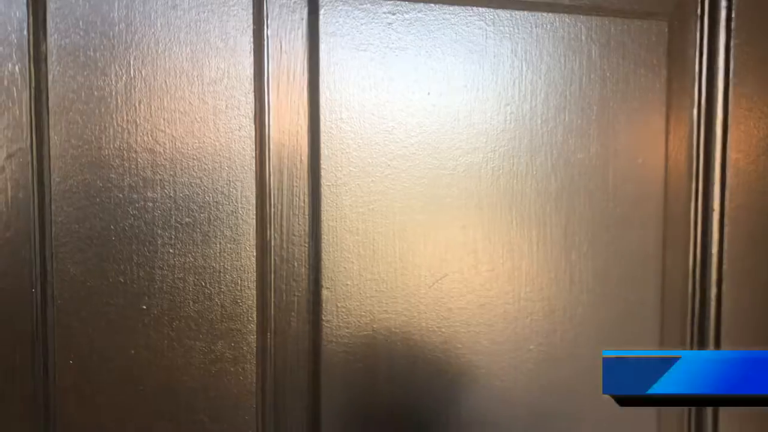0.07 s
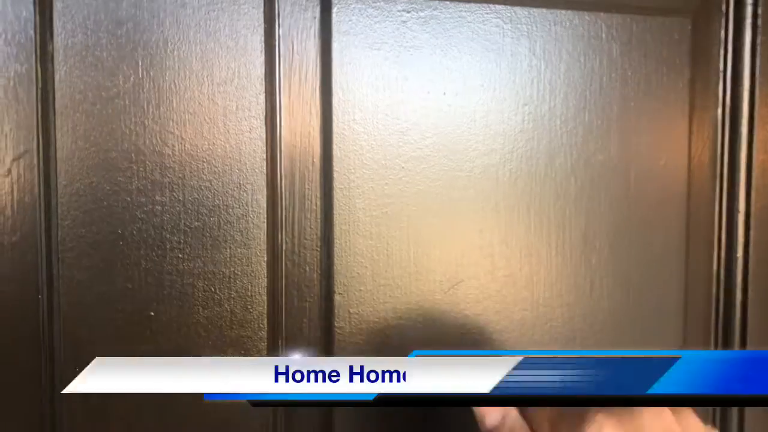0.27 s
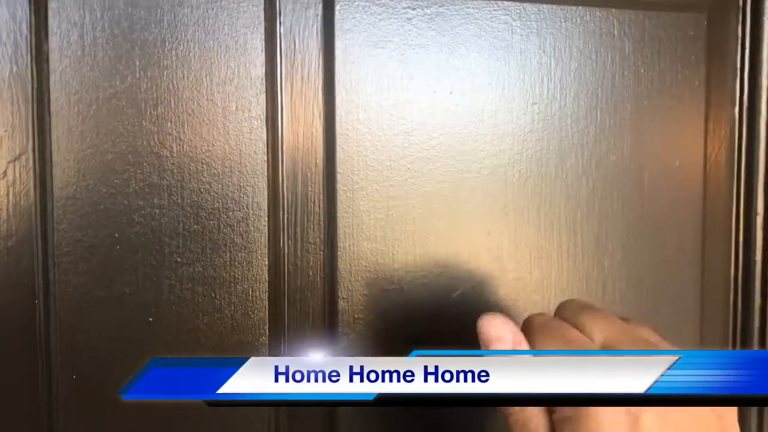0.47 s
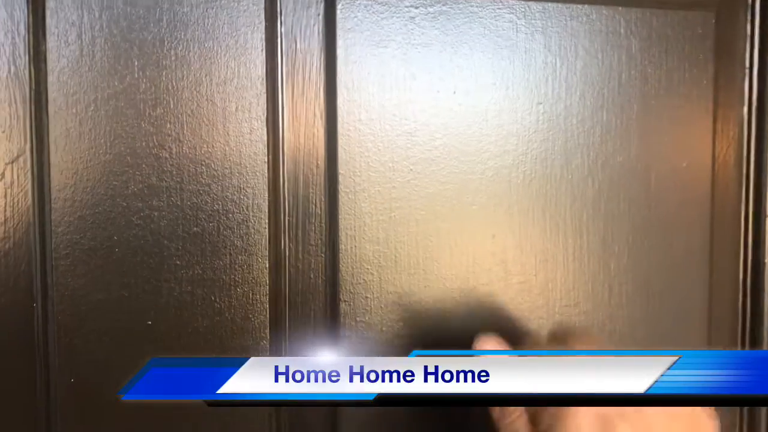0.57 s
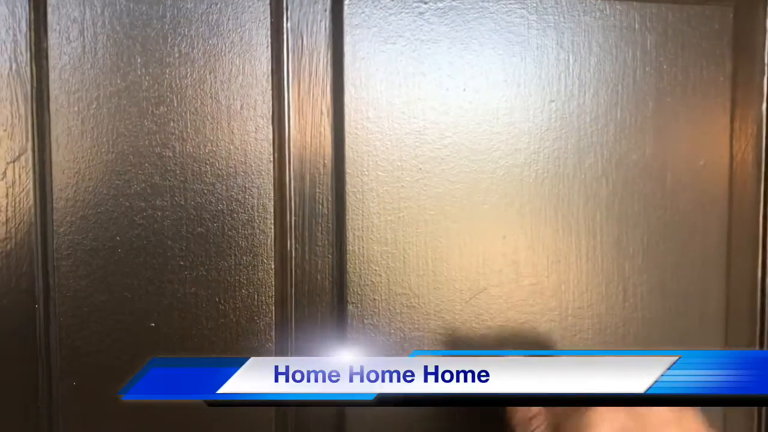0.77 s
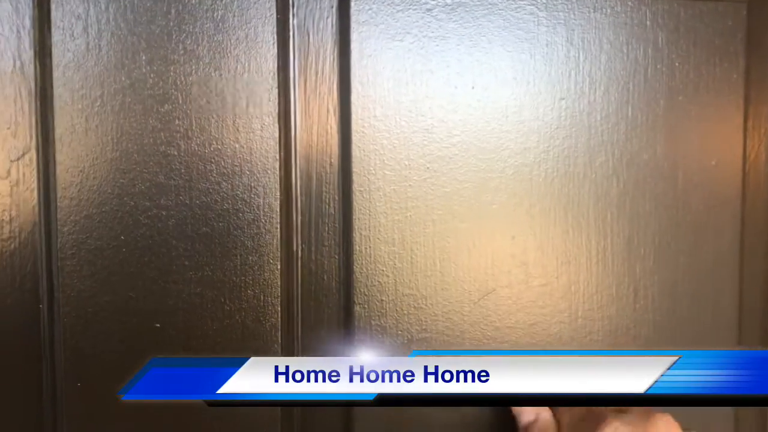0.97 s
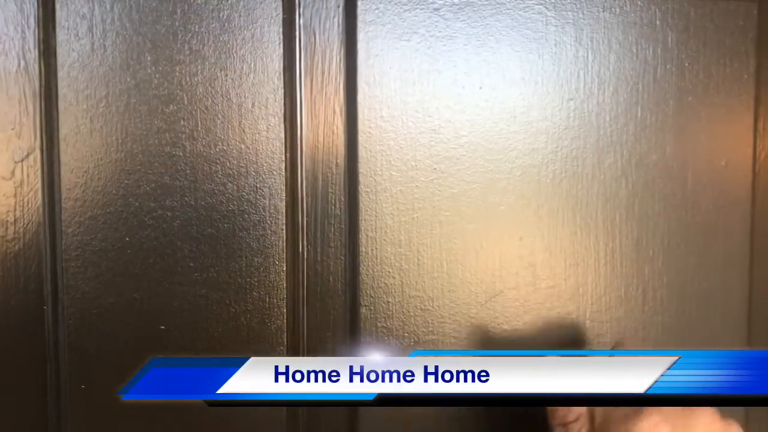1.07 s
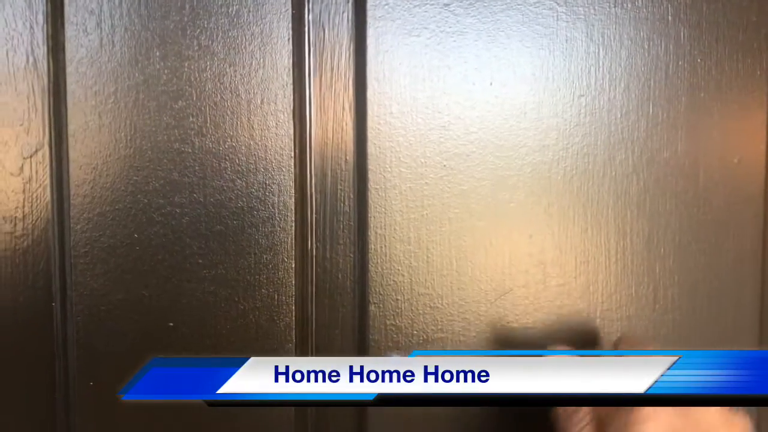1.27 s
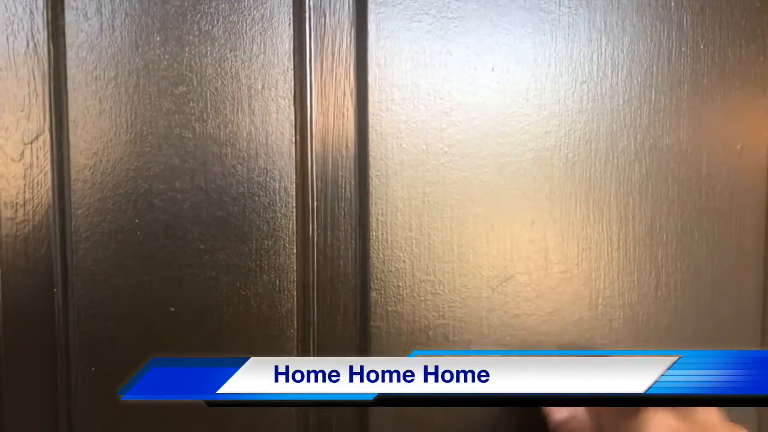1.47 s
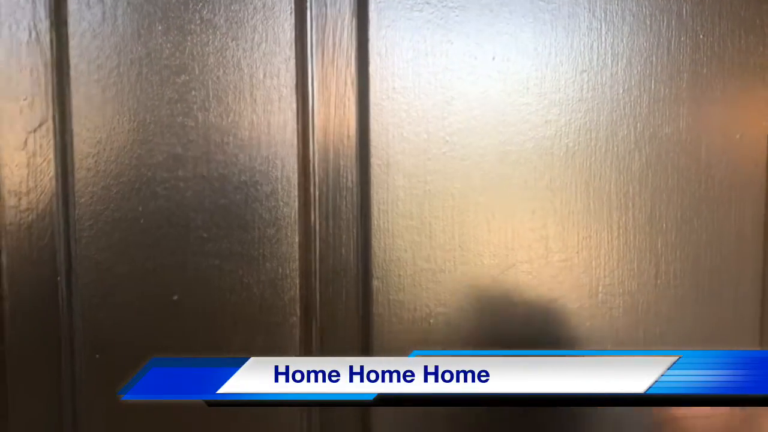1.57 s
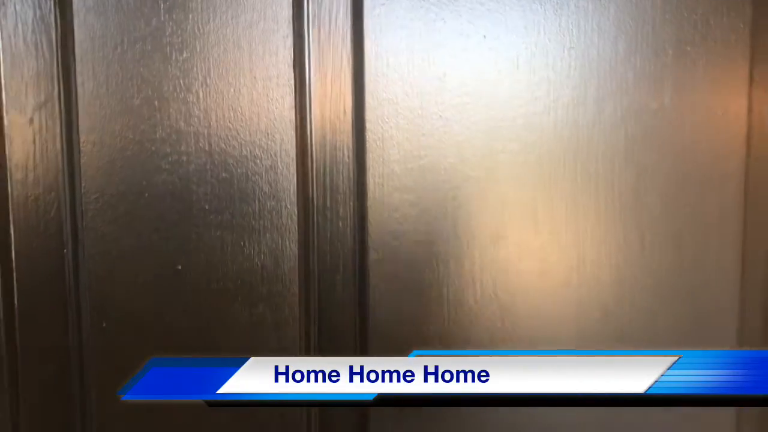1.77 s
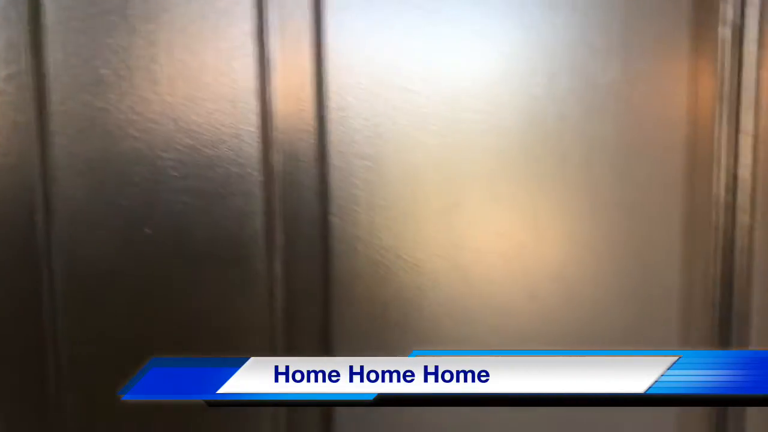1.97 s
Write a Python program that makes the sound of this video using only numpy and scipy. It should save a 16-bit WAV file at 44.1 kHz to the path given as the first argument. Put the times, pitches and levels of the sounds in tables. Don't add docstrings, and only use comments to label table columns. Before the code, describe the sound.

Four quick knuckle knocks on a wooden panelled door, the first duller, the rest harder and brighter, with low door boom, latch rattle and short hallway echo; close microphone, faint sparrow chirps and far traffic behind.

```python
import sys
import numpy as np
from scipy import signal
from scipy.fft import rfft, irfft
from scipy.io import wavfile

SR = 44100
rng = np.random.default_rng(int(sys.argv[2]) if len(sys.argv) > 2 else 0)


def waveform_to_disk(signal):
    frames = np.transpose(np.atleast_2d(signal))
    scaled = np.clip(frames, -1, 1) * 32767
    samples = np.round(scaled).astype(np.int16)
    wavfile.write(sys.argv[1], SR, samples)


def ratio(d):
    e = np.asarray(d, float) / 20
    return 10 ** e


N = 88640


def rms_one(x):
    return x / np.sqrt(np.mean(x ** 2) + 1e-20)


def at_hz(points, hz):
    table_hz, value = np.transpose(points)
    return np.interp(np.log(hz + 1e-3), np.log(table_hz), value)


def colour(x, points):
    hz = np.fft.rfftfreq(len(x), 1 / SR)
    return irfft(rfft(x) * ratio(at_hz(points, hz)), len(x))


def ring(clicks, hz, t60):
    r = ratio(-60 / (t60 * SR))
    w = 2 * np.pi * hz / SR
    return signal.lfilter([0, np.sin(w)], [1, -2 * r * np.cos(w), r * r], clicks + 1e-18)


def clicks_at(s, db):
    out = np.zeros(N)
    out[(np.asarray(s) * SR).astype(int)] = ratio(db)
    return out


def dying_noise(t60):
    t = np.arange(SR // 2) / SR
    tail = rng.standard_normal(SR // 2) * ratio(-60 * t / t60)
    return tail / np.sqrt(np.sum(tail ** 2))


# (frequency [Hz], level per Hz [dB])
HUM_COLOUR = [(21, -22), (36, -5.5), (90, -0.5), (511, -19.5), (749, -16.5), (1530, -25), (1830, -28.5),
              (5340, -35), (16000, -46.5)]
# (time [s], level [dB])
HUM_SWELL = [(.2, -0.6), (.75, -0.96), (.95, -2), (1.45, -1), (1.65, 3), (1.8, 2), (2.0, -1.1)]
HUM_DB = -49.5


def traffic_hum():
    swell_db = np.interp(np.arange(N) / SR, *np.transpose(HUM_SWELL))
    noise = colour(rng.standard_normal(N), [(24, -50)] + HUM_COLOUR)
    return ratio(HUM_DB + swell_db) * rms_one(noise)


# (time [s], level [dB], top pitch [Hz], end pitch [Hz], length [s])
CHIRPS = [(0.376, -51, 5430, 3500, 0.065), (0.391, -52, 5570, 4300, 0.055), (0.418, -59, 5550, 4020, 0.077),
          (0.912, -61, 5260, 5100, 0.018), (0.914, -61.5, 3460, 3400, 0.017), (.924, -62, 6120, 5900, 0.01),
          (0.927, -58.5, 4210, 3350, 0.037), (1.773, -49, 5390, 3900, .05)]
SCOOP, TOP_S = .08, .013
WARBLE_DB, WARBLE_HZ = 8, 68
FADE_DB_PER_S = 330
STREET_DB, STREET_T60_S = -3, 0.37


def sparrows():
    out = np.zeros(N)
    for s, db, top_hz, end_hz, length in CHIRPS:
        t = np.arange(int(length * SR)) / SR
        after_top = np.maximum(t - TOP_S, 0)
        slide = after_top / max(length - TOP_S, .002)
        scoop = 1 - SCOOP * np.maximum(1 - t / TOP_S, 0) ** 2
        hz = top_hz * scoop + (end_hz - top_hz) * slide ** 1.25
        warble_db = WARBLE_DB * np.sqrt(slide) * np.sin(2 * np.pi * WARBLE_HZ * t)
        level = ratio(db + warble_db - FADE_DB_PER_S * after_top)
        edges = np.minimum(np.minimum(t, length - t) / .007, 1)
        out[int(s * SR):][:len(t)] += level * edges * np.sin(2 * np.pi * np.cumsum(hz) / SR)
    street = signal.fftconvolve(out, dying_noise(STREET_T60_S))[:N]
    return out + ratio(STREET_DB) * street


# (time [s], level [dB], panel mode [Hz], t60 [s])
BRUSHES = [
    (.998, -50.5, 740, 0.12),
    (1.7495, -43.5, 689, 0.038),
]


def brushes():
    out = np.zeros(N)
    for s, db, hz, t60 in BRUSHES:
        swell = ring(ring(clicks_at([s], [db]), hz, t60), hz, t60)
        out += swell * np.e * np.log(1000) * 2 / (t60 * SR)
    return out


# (time [s], peak level [dB], length [s])
CHATTER = [(0.733, -43, 0.0034), (0.7753, -39.5, 0.005), (0.7828, -21.5, 0.0021), (1.053, -46.5, 0.012),
           (1.063, -18, 0.0053), (1.08, -47, 0.0055), (1.126, -35, 0.0028), (1.1325, -39, 0.005),
           (1.1601, -31, 0.0049), (1.1674, -38, 0.0036), (1.2998, -26.5, 0.0036), (1.3071, -19.5, 0.0018),
           (1.3267, -27, 0.0023), (1.361, -46, 0.0048), (1.3714, -27.5, 0.0038), (1.3815, -33.5, 0.0033),
           (1.3987, -30, 0.0055), (1.423, -60, 0.0031), (1.5217, -30, 0.0038), (1.5286, -21, 0.0028),
           (1.5905, -28.5, 0.0049), (1.603, -36.5, 0.0063), (1.6241, -29.5, 0.004), (1.652, -40, 0.004)]
# (frequency [Hz], level per Hz [dB])
CHATTER_COLOUR = [(1060, 2.5), (1800, -4.5), (2390, -11), (2820, -11), (3810, -10), (4700, -5), (8910, -15),
                  (11400, -15.5), (16000, -23)]
CHATTER_DB, CHATTER_RISE_S, CLICKS_PER_S = -2, 0.0029, 5900
CHATTER_WET_DB, CHATTER_T60_S = -9.5, 0.13


def latch_chatter():
    t = np.arange(N) / SR
    gate = np.zeros(N)
    for s, db, length in CHATTER:
        since = np.maximum(t - s + CHATTER_RISE_S, 0)
        gate += ratio(db) * (1 - np.exp(-since / CHATTER_RISE_S)) * np.exp(-since / length)
    grains = rng.standard_normal(N) * (rng.random(N) < CLICKS_PER_S / SR)
    metal = rms_one(colour(grains, [(900, -36)] + CHATTER_COLOUR))
    close = ratio(CHATTER_DB) * gate * metal
    return close + ratio(CHATTER_WET_DB) * signal.fftconvolve(close, dying_noise(CHATTER_T60_S))[:N]


# (frequency [Hz], t60 [s])
SWAY_CHAIN = [(70.5, .45), (76, .64), (81.5, .42)]
SWAY_DB, SWAY_LAG_S = -15.5, .0107
HINGE_HZ, HINGE_T60_S, HINGE_DB, PUSH_HZ = 46.9, 1, -32, 60.5
FRAME_HZ, FRAME_T60_S, FRAME_DB = 98.1, 0.19, -22.5


def leaf_sway():
    s, db, _, sway_db = np.transpose(KNOCKS)
    unit = clicks_at([0], [0])
    chain = clicks_at(s + SWAY_LAG_S, db + sway_db)
    for hz, t60 in SWAY_CHAIN:
        unit = ring(unit, hz, t60)
        chain = ring(chain, hz, t60)
    leaf = chain / np.abs(unit).max()
    hinge = ring(clicks_at(s, db), HINGE_HZ, HINGE_T60_S)
    hinge = signal.lfilter(*signal.butter(2, PUSH_HZ, fs=SR), hinge)
    frame = ring(clicks_at(s + SWAY_LAG_S, db), FRAME_HZ, FRAME_T60_S)
    return ratio(SWAY_DB) * leaf + ratio(HINGE_DB) * hinge + ratio(FRAME_DB) * frame


# (frequency [Hz], t60 [s], level [dB])
HALL = [(133, 0.37, 7.3), (200, 0.11, 0), (281, .35, -0.1), (700, .25, 0.63), (1280, 0.068, -0.5),
        (2340, 0.27, 7.5)]
HALL_DB, HALL_RISE_S = -4, 0.0051


def hallway(blow):
    t = np.arange(SR // 2) / SR
    hz, t60s, levels_db = np.transpose(HALL)
    tail = np.zeros(SR // 2)
    edges = 110 * 2 ** np.arange(0, 5.1, .5)
    for low, high in zip(edges, edges[1:]):
        band = signal.butter(2, [low, high], "band", fs=SR, output="sos")
        middle = np.sqrt(low * high)
        t60 = at_hz(np.column_stack([hz, t60s]), middle)
        db = at_hz(np.column_stack([hz, levels_db]), middle)
        tail += ratio(db) * signal.sosfilt(band, dying_noise(t60)) * (1 - np.exp(-t / HALL_RISE_S))
    return ratio(HALL_DB) * signal.fftconvolve(blow, tail)[:N]


# (frequency [Hz], level [dB], t60 [s])
PANELS = [(167.2, -3, 0.25), (219.5, 3.5, 0.13), (269.8, -4.5, 0.44), (290, -9.5, .3), (353.5, -11.5, 0.39),
          (455, -11, 0.13), (544.7, 2.5, 0.25), (587.2, -4.5, .2), (650, -7.5, .3), (694, -11, 0.36),
          (766, -5, 0.13), (925, -1, 0.22), (1185, -7, 0.21), (1385.4, 4, .14)]
PANELS_DB = -24
TWIN_HZ, TWIN_DB = 12, -9


def panels(blow):
    out = np.zeros(N)
    for k, (hz, db, t60) in enumerate(PANELS):
        mode = ring(blow, hz, t60) + ratio(TWIN_DB) * ring(blow, hz + TWIN_HZ, t60)
        out += (-1) ** k * ratio(db) * mode
    return ratio(PANELS_DB) * 0.028 * out


# (time [s], peak level [dB], brightness [dB per octave], sway level [dB])
KNOCKS = [
    (0.771, -4.5, -4.04, -8.1),
    (1.051, 1.5, -1.36, -5.9),
    (1.295, 1, -2.45, -1.3),
    (1.519, 2.5, -0.85, -2.9),
]
# (frequency [Hz], level [dB])
BLOW = [(90, -22), (185, -7.5), (290, -1), (420, -3), (900, -3.5), (1180, -4), (1500, -20), (2300, -36),
        (4000, -75)]
# (delay [s], level [dB], extra path share [1], sign [1])
RETURNS = [(.0034, -9.5, 0, 1), (.00375, -14, .8, -1), (.0104, -11, .5, 1), (.0223, -16, .15, -1)]
BLOW_DB = -0.5
LEAD_S, SPREAD_S_ROOT_HZ = .0008, .112
FRONT_S, FRONT_RISE_S = .0012, .0012


def blows():
    hz = np.fft.rfftfreq(N, 1 / SR)
    t = np.arange(N) / SR
    bend = -4j * np.pi * SPREAD_S_ROOT_HZ * np.sqrt(hz)
    shape = ratio(at_hz(BLOW, hz)) * np.exp(bend + 1j * np.pi / 4)
    shape = shape / np.abs(irfft(shape, N)).max()
    direct = np.zeros(N)
    for s, db, tilt_db, _ in KNOCKS:
        start = s - LEAD_S
        level = ratio(db + BLOW_DB + tilt_db * np.log2((hz + 50) / 500))
        wave = irfft(shape * level * np.exp(-2j * np.pi * hz * start), N)
        front = np.clip((t - start - FRONT_S) / FRONT_RISE_S, 0, 1)
        direct += wave * np.sin(np.pi / 2 * front) ** 2
    paths = 0
    for s, db, share, sign in RETURNS:
        paths = paths + sign * ratio(db) * np.exp(share * bend - 2j * np.pi * hz * s)
    return direct, irfft(rfft(direct) * paths, N)


def door():
    direct, returns = blows()
    return direct + returns + panels(direct) + hallway(direct)


def scene():
    street = traffic_hum() + sparrows()
    return (street + brushes() + latch_chatter() + leaf_sway() + door())[None]


def band_limit(x):
    return signal.sosfilt(signal.butter(12, 16470, fs=SR, output="sos"), x)


RUMBLE_CUT_HZ, TREBLE_CUT_HZ = 27, 16300
FADE_START_S, FADE_S, FADE_DEPTH_DB = 0.12, 0.056, -22
TOP = 2.0


def record(dry):
    dry = signal.sosfilt(signal.butter(2, RUMBLE_CUT_HZ, "high", fs=SR, output="sos"), dry)
    rise = np.clip((np.arange(N) / SR - FADE_START_S) / FADE_S, 0, 1)
    fade = (rise > 0) * ratio(FADE_DEPTH_DB * (1 - rise) ** 2)
    x = TOP * np.tanh(dry * fade / TOP)
    x = signal.sosfilt(signal.ellip(12, .5, 70, TREBLE_CUT_HZ, fs=SR, output="sos"), x)
    return band_limit(x)


dry = scene()
out = record(dry)
waveform_to_disk(out)
```